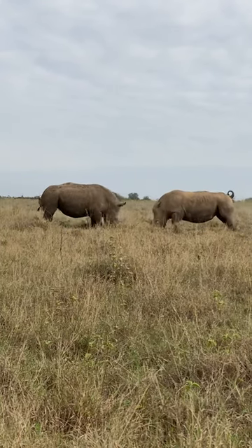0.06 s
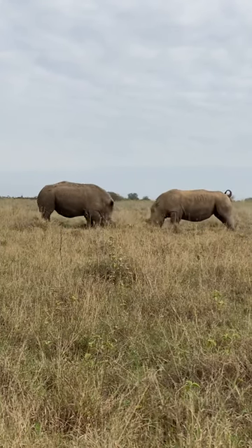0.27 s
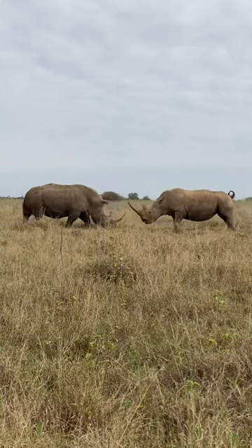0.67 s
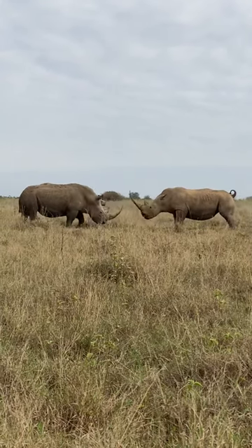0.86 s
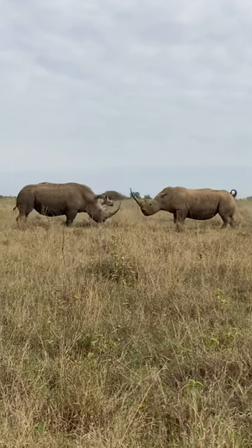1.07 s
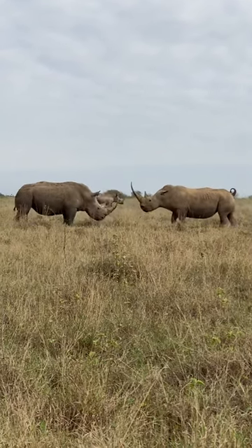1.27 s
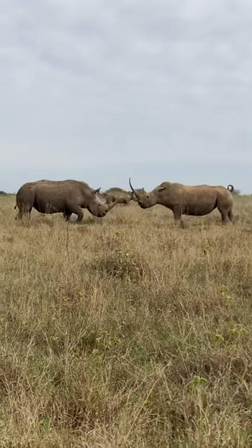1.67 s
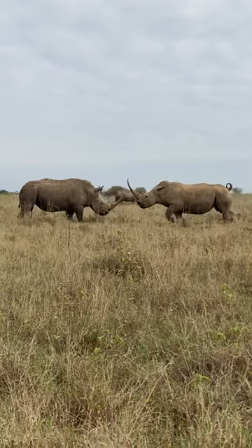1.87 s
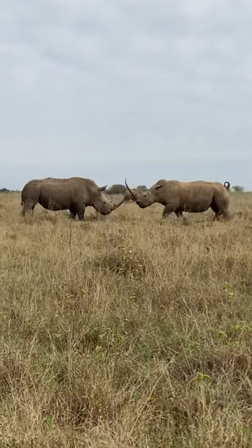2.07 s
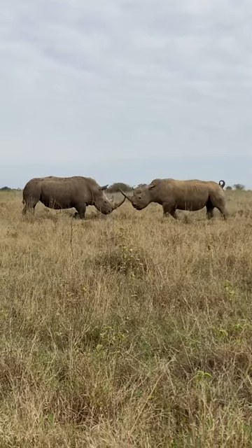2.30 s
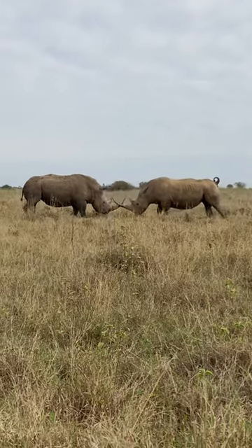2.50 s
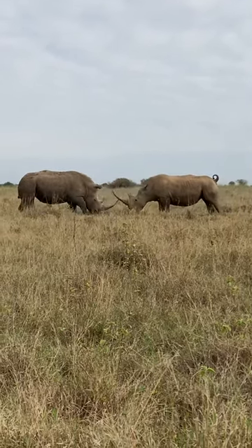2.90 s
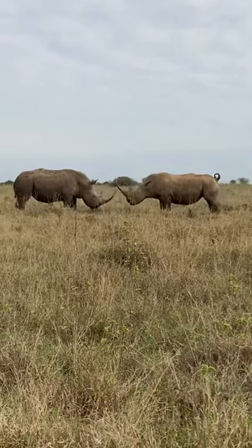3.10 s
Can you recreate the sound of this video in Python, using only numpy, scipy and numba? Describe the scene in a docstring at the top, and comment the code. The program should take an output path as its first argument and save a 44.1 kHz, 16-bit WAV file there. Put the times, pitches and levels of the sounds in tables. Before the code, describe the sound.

Two rhinos growl on an open plain. A low, rough growl breaks into a snort, soft puffs and sniffs follow, then longer growls with a brief horn scrape and knock end in another snort. Light wind bumps the microphone.

```python
"""Two rhinos growl at each other on an open plain. A growl is a slow flutter of tissue that rings
a long throat; it swells and breaks into a snort, a jet of air through flapping nostrils.
Softer puffs, sniffs and a grunt come between. Horns scrape briefly; there are two dull knocks
and a sharp one. A light wind rumbles and bumps on the microphone."""
import sys
import numpy as np
from scipy import signal
from scipy.fft import rfft, irfft
from scipy.io import wavfile
from scipy.ndimage import uniform_filter1d
from numba import njit

SR = 44100
rng = np.random.default_rng(int(sys.argv[2]) if len(sys.argv) > 2 else 0)


def inscribe(sig):
    """Save sig as 16-bit PCM at rate SR to the path in sys.argv[1].

    A 1-D sig is mono; a 2-D sig holds one channel per row.
    Samples are clipped to [-1, 1] before scaling.
    """
    pcm = np.round(np.clip(np.atleast_2d(sig).T, -1, 1) * 32767)
    wavfile.write(sys.argv[1], SR, pcm.astype(np.int16))


N = 143325
T = np.arange(N) / SR
FREQ_HZ = np.fft.rfftfreq(N, 1 / SR)

# Spectra. Each row: frequency in Hz, relative density in dB.
AIR_SPECTRUM = [(300, 1.5), (700, -13.5), (1400, -23), (5900, -24.5), (12000, -35)]
WIND_SPECTRUM = [(20, -36), (35, -8.5), (70, -3.5), (125, -7.5), (200, -16), (300, -27), (500, -34),
                 (750, -58.5), (1500, -87)]
PUFF_SPECTRUM = [(700, -18), (950, -6.5), (1200, -25.5), (1850, -2.5), (2330, 1), (3100, -24), (3570, -9.5),
                 (4000, -23.5), (4400, -14.5), (5200, -24), (12000, -52)]
SNIFF_SPECTRUM = [(600, -33), (1300, -5), (2170, 0), (3100, -4), (3900, -0.5), (5400, -2.5), (10200, -8),
                  (12000, -16.5)]
JET_SPECTRUM = [(700, -45), (1020, -4), (1360, -11.5), (1700, 4), (2400, -9.5), (3500, -14.5),
                (4200, -14.5), (5600, -17.5), (6700, -27.5), (12000, -36)]
RASP_SPECTRUM = [(600, -33), (1020, -11.5), (1250, -17.5), (1700, -12), (2000, -10), (2300, -4.5),
                 (2950, -16), (4100, -15.5), (5300, -20), (6500, -31.5), (12000, -45)]
CHEST_SPECTRUM = [(60, -22.5), (125, 1), (300, 2), (620, -10.5), (860, -30), (2200, -60)]
# Wind strength. Each row: time in seconds, level in dB.
GUSTS = [(.3, -44), (.6, -49), (.85, -57.5), (1.3, -64), (1.55, -55.5), (1.85, -57.5), (1.95, -44),
         (2.15, -53), (2.85, -47), (3.05, -54)]
# Eddies on the microphone. Each row: centre in seconds, pitch in Hz, width in seconds, peak in dB.
EDDIES = [(0.197, 66, 0.0075, -23), (.273, 95, 0.0047, -28), (0.599, 70, 0.019, -40.5),
          (1.92, 83.6, 0.012, -25.5), (1.956, 64.6, 0.033, -29.5), (1.944, 122, 0.01, -29),
          (2.012, 100, 0.005, -30), (2.154, 68, 0.0081, -28), (2.819, 70, 0.043, -36),
          (2.854, 75, 0.0064, -25)]
# Horn slips. Each row: start in seconds, level in dB.
HORN_SLIPS = [(2.258, -64.5), (2.2845, -56.5), (2.308, -56.5)]
# Knocks. Each row: start in seconds, ring, crack and thud in dB, crack and thud decay in seconds.
KNOCK_HITS = [(0.083, -76, -53, -40.5, 0.0053), (2.158, -71, -44.5, -30, 0.0029),
              (2.3437, -19.5, -79, -60, 0.0016)]
# Ring of a knock. Each row: frequency in Hz, T60 in seconds, relative level in dB.
KNOCK_RING = [(1688, 0.0075, 5), (1900, 0.0022, 1), (4000, 0.011, -21.5)]
# Soft calls. Each row: start, attack and hold in seconds, level in dB.
PUFF_CALLS = [(-.03, 0.012, 0.044, -61), (0.048, 0.023, 0.11, -65.5), (0.214, 0.091, 0.021, -62.5),
              (1.323, 0.014, 0.065, -67.5), (1.884, 0.069, 0.029, -73.5)]
SNIFF_CALLS = [(0.38, 0.1, 0.083, -64), (0.872, 0.048, 0.015, -75.5), (1.022, 0.047, 0.072, -73),
               (3.059, 0.058, 0.077, -65.5)]
GRUNT_CALLS = [(1.092, 0.023, 0.047, -58.5)]
# Narrow airway resonances. Each row: frequency in Hz, relative level in dB.
AIRWAY_MODES = [(1640, 0.5), (1850, -2.5), (2147, -0.5), (2254, -1), (2519, -10)]
# Nose and upper throat resonances. Each row: frequency and width in Hz, relative level in dB.
NOSE_MODES = [(258.5, 37.6, 25), (302.4, 36, 11), (531, 29, 1), (1000, 26, -5)]
THROAT_MODES = [(1074, 95, 2), (1365, 43, -0.5)]
# Snorts. Each row: start, attack and hold in seconds, body and jet in dB, jet tilt in dB per octave.
SNORT_CALLS = [(0.537, 0.023, 0.054, -36, -48.5, 2), (1.426, 0.038, 0.11, -57, -79.5, -16),
               (1.656, 0.031, 0.1, -63, -78, -4), (2.825, 0.027, 0.053, -39, -52, 2.5)]
# One track per growl. Each row: time in seconds, flutter rate, low and second resonance in Hz,
# low resonance, second resonance and rasp levels in dB, roughness from 0 to about 1.
GROWL_TRACKS = [
    [(.29, 93.34, 153, 470, -56.5, -79, -63.5, 0.66), (.325, 93.57, 144, 454, -32, -43, -65.5, 0.57),
     (.365, 62.3, 179, 452, -33, -44, -68.5, 0.69), (.435, 58.15, 164.3, 458, -28, -38, -76, 0.45),
     (.495, 63.97, 193.4, 450.5, -41, -41, -61.5, 0.27), (.53, 70.55, 223, 481, -49.5, -36, -54, 0.42),
     (.56, 74.5, 204, 490, -34.5, -47, -53, 0.88)],
    [(2.02, 39.82, 197, 477, -72.5, -73, -71.5, 0.71), (2.17, 39.76, 205.4, 487, -51.5, -51.5, -72.5, 0.58),
     (2.27, 40.1, 209, 510, -49.5, -58, -68, 0.41), (2.33, 47.47, 196.7, 505, -43.5, -56.5, -58.5, 0.39),
     (2.43, 46.74, 189, 435, -42, -53, -60, 0.14), (2.5, 44.2, 161, 430, -55.5, -77, -69.5, 0.2)],
    [(2.501, 45.28, 132, 462, -50.5, -99, -63.5, 0.06), (2.575, 45.27, 155.5, 445, -40, -54, -62.5, 0.06),
     (2.68, 45.46, 176, 465, -40, -48, -59, 0.04), (2.745, 47.6, 178, 487, -33.5, -47, -56, 0.11),
     (2.81, 46.2, 178.6, 509, -36, -43.5, -59, 0.82), (2.86, 46.05, 168, 474, -37.5, -46.5, -58, 0.85),
     (2.9, 54.9, 181, 508, -59.5, -40.5, -92, 1.03), (2.99, 54.8, 192, 544, -55, -61, -65, 0.06)],
]

LOW_WIDTH_HZ, SECOND_WIDTH_HZ = 13.3, 15.7  # throat resonances


def undb(db):
    """Decibels to gain."""
    return 10 ** (np.asarray(db) / 20)


def unit(x):
    """Scale to rms 1."""
    return x / np.sqrt(np.mean(x ** 2) + 1e-30)


def steady(x, samples=3000):
    """Hold the short-term rms at 1."""
    return x / np.sqrt(np.abs(uniform_filter1d(x ** 2, samples)) + 1e-9)


def shape(x, spectrum):
    """Filter by (Hz, dB) points."""
    hz, db = np.array(spectrum, float).T
    gain_db = np.interp(np.log(np.maximum(FREQ_HZ, 1)), np.log(hz), db)
    return irfft(rfft(x) * undb(gain_db), N)


def noise(spectrum):
    """Coloured noise, rms 1."""
    return unit(shape(rng.standard_normal(N), spectrum))


def wander(turns_per_s):
    """Straight lines between Gaussian random values."""
    return np.interp(T * turns_per_s, np.arange(1000), rng.standard_normal(1000))


@njit
def bandpass(x, hz, width_hz):
    """Moving state-variable band-pass, gain 1 at the centre."""
    y, band_state, low_state = np.empty(len(x)), 0., 0.
    for i in range(len(x)):
        g, damping = np.tan(np.pi * hz[i] / SR), width_hz[i] / hz[i]
        band = (band_state + g * (x[i] - low_state)) / (1 + g * (g + damping))
        band_state = 2 * band - band_state
        low_state += 2 * g * band
        y[i] = damping * band
    return y


def ring(x, hz, width_hz):
    """One resonance, rms 1; a second, wide band-pass steepens the skirts."""
    hz = hz * np.ones(N)
    narrow = bandpass(x, hz, width_hz * np.ones(N))
    return unit(bandpass(narrow, hz, 0.85 * hz))


def rings(x, modes):
    """Several resonances on one excitation, rms 1."""
    return unit(sum(undb(db) * ring(x, hz, width_hz) for hz, width_hz, db in modes))


def swell(start_s, attack_s, hold_s, db, fall_db_per_s):
    """Linear attack, hold, exponential release."""
    rise = np.clip((T - start_s) / attack_s, 0, 1)
    release_s = np.maximum(T - start_s - attack_s - hold_s, 0)
    return rise * undb(db - fall_db_per_s * release_s)


def still_air(db=-70.5):
    """Faint noise floor, independent left and right."""
    return undb(db) * np.array([noise(AIR_SPECTRUM), noise(AIR_SPECTRUM)])


def wind():
    """Low rumble follows the gusts; single eddies bump the microphone."""
    rumble = steady(noise(WIND_SPECTRUM), samples=6000) * undb(np.interp(T, *np.array(GUSTS).T))
    bumps = sum(undb(db) * np.exp(-((T - at_s) / width_s) ** 2) * np.cos(2 * np.pi * hz * (T - at_s))
                for at_s, hz, width_s, db in EDDIES)
    return rumble - bumps


def scrapes(rise_s=0.0024):
    """Short gritty slips of horn on horn."""
    envelope = 0
    for start_s, db in HORN_SLIPS:
        age = np.maximum(T - start_s, 0) / rise_s
        envelope += undb(db) * age * np.exp(1 - age)
    return noise(RASP_SPECTRUM) * envelope


def knocks(contact_s=0.00054, thud_hz=370):
    """Dry knocks: a very short ring, a crack and a dull thud."""
    crack = noise([(300, -42), (1200, -2), (2200, -9.5), (4000, -21.5), (11000, -34.5)])
    out = 0
    for start_s, ring_db, crack_db, thud_db, decay_s in KNOCK_HITS:
        age_s = np.maximum(T - start_s, 0)
        onset = 1 - np.exp(-(age_s / contact_s) ** 2)
        modes = sum(undb(db - 60 * age_s / t60_s) * np.sin(2 * np.pi * hz * age_s)
                    for hz, t60_s, db in KNOCK_RING)
        burst = undb(crack_db) * crack + undb(thud_db) * np.sin(2 * np.pi * thud_hz * age_s)
        out += onset * (undb(ring_db) * modes + np.exp(-age_s / decay_s) * burst)
    return out


def flicker(x, depth_db=3.5):
    """Turbulence: each half octave from 1 to 8 kHz wavers on its own."""
    half_octaves = 2 * np.log2(np.clip(FREQ_HZ / 1000, 1, 8))
    bins, out = rfft(x), 0
    for k in range(7):
        band = irfft(bins * np.maximum(1 - abs(half_octaves - k), 0), N)
        out += undb(depth_db * wander(turns_per_s=55)) * band
    return out


def airflow(spectrum, modes_db, width_hz=31):
    """Turbulent air with the narrow resonances of the long airway singing in it, rms 1."""
    turbulence = noise(spectrum)
    peaks = sum(undb(db) / (1 + (2 * (FREQ_HZ - hz) / width_hz) ** 2) for hz, db in AIRWAY_MODES)
    singing = unit(irfft(rfft(rng.standard_normal(N)) * peaks, N))
    return unit(flicker(turbulence + undb(modes_db) * singing))


def puffs():
    """Soft puffs of air through the nostrils."""
    breath = airflow(PUFF_SPECTRUM, modes_db=-11)
    return breath * sum(swell(*call, fall_db_per_s=214) for call in PUFF_CALLS)


def sniffs():
    """Thin hissing sniffs."""
    return noise(SNIFF_SPECTRUM) * sum(swell(*call, fall_db_per_s=207.5) for call in SNIFF_CALLS)


def grunt(hz=182.7):
    """Noise briefly rings one low resonance."""
    tone = steady(ring(rng.standard_normal(N), hz, LOW_WIDTH_HZ))
    return tone * sum(swell(*call, fall_db_per_s=407) for call in GRUNT_CALLS)


def flutter(start_s, hz, rough, jitter=0.34, shimmer_db=-5.5):
    """Flapping tissue: pulses, uneven with roughness, and the 0-1 phase of each cycle."""
    pulses, marks, i = np.zeros(N), [0], max(int(start_s * SR), 1)
    for stretch, size in rng.standard_normal((400, 2)):
        if i >= N:
            break
        pulses[i] = undb(shimmer_db * rough[i] * size)
        marks.append(i)
        i += int(SR / hz[i] * np.exp(jitter * rough[i] * stretch)) + 1
    phase = np.interp(np.arange(N), marks, np.arange(len(marks))) % 1
    return pulses, phase


def snorts(flap_hz=74.5, flap_depth=0.2, tilt_above_hz=2000, body_delay_s=0.017):
    """A jet of air flaps the nostrils; the hollow of the nose sounds on after the hiss."""
    _, phase = flutter(0, np.full(N, flap_hz), rough=np.ones(N))
    flap = unit(1 + flap_depth * np.cos(2 * np.pi * phase))
    body = steady(rings(flap * rng.standard_normal(N), NOSE_MODES), samples=1500)
    jet_bins = rfft(flap * airflow(JET_SPECTRUM, modes_db=-4))
    octaves = np.log2(np.maximum(FREQ_HZ / tilt_above_hz, 1))
    out = 0
    for start_s, attack_s, hold_s, body_db, jet_db, db_per_octave in SNORT_CALLS:
        hiss = unit(irfft(jet_bins * undb(db_per_octave * octaves), N))
        out += hiss * swell(start_s, attack_s, hold_s, jet_db, fall_db_per_s=188)
        out += body * swell(start_s + body_delay_s, attack_s, hold_s, body_db, fall_db_per_s=98.5)
    return out


def growl(track, chest_db=-3.5, throat_db=-25, rattle_db=2.5, rasp_cycles=0.16, leak=0.11):
    """Flutter rings the throat, and the chest when rough; air rasps through, surging once a cycle."""
    times_s, *columns = np.array(track).T
    flutter_hz, low_hz, second_hz, low_db, second_db, rasp_db, rough = (
        np.interp(T, times_s, column) for column in columns)
    pulses, phase = flutter(times_s[0], flutter_hz, rough)
    surges = 2 * np.exp(-phase / rasp_cycles) * undb(rattle_db * wander(turns_per_s=35))
    flow = unit(1.87 + surges)
    drive = pulses + leak * rough * flow * rng.standard_normal(N)
    waver = np.exp(0.053 * rough * wander(turns_per_s=35))  # roughness shakes the resonances
    low = steady(ring(drive, low_hz * waver, LOW_WIDTH_HZ))
    chest = rough * undb(chest_db) * steady(shape(drive, CHEST_SPECTRUM))
    second = steady(ring(drive, second_hz * waver, SECOND_WIDTH_HZ * (1 + rough)))
    throat = undb(throat_db) * steady(rings(drive, THROAT_MODES))
    rasp = flow * airflow(RASP_SPECTRUM, modes_db=-6)
    gate = uniform_filter1d(1. * ((T > times_s[0]) & (T < times_s[-1])), size=600)
    return gate * (undb(low_db) * (low + chest) - undb(second_db) * (second + throat)
                   + undb(rasp_db) * rasp)


def ground_scatter(x, db=-19.5, decay_s=0.017):
    """Faint, short tail scattered by grass and ground."""
    tail = rng.standard_normal(N) * np.exp(-T / decay_s)
    return undb(db) * signal.fftconvolve(x, tail / np.linalg.norm(tail))[:N]


def scene(right_lag_s=0.00003, right_over_left_db=1.05):
    """Stereo mix: the animals near the centre, wind and still air around them."""
    animals = sum(growl(track) for track in GROWL_TRACKS)
    animals += scrapes() + snorts() + puffs() + sniffs() + grunt() + knocks()
    side = ground_scatter(animals)
    delayed = irfft(rfft(animals) * np.exp(-2j * np.pi * FREQ_HZ * right_lag_s), N)
    left = (animals + side) * undb(-right_over_left_db / 2)
    right = (delayed - side) * undb(right_over_left_db / 2)
    return np.array([left, right]) + wind() + still_air()


def record(dry, low_cut_hz=33, notch_hz=4870, notch_width_hz=420, top_hz=12000):
    """Microphone: deepest rumble lost, a narrow dip in the treble, top cut."""
    x = signal.sosfilt(signal.butter(2, low_cut_hz, "high", fs=SR, output="sos"), dry)
    x = signal.lfilter(*signal.iirnotch(notch_hz, notch_hz / notch_width_hz, fs=SR), x)
    return signal.sosfilt(signal.ellip(8, .2, 70, top_hz, fs=SR, output="sos"), x)


dry = scene()
out = record(dry)
inscribe(out)
```